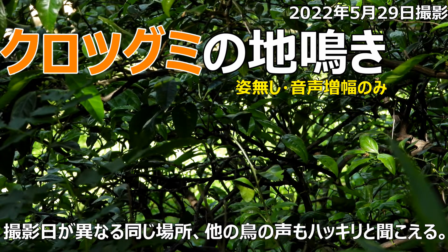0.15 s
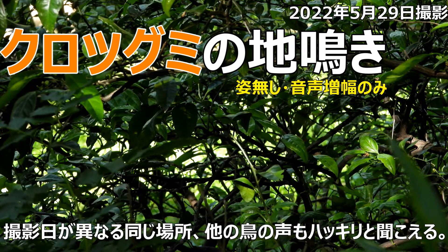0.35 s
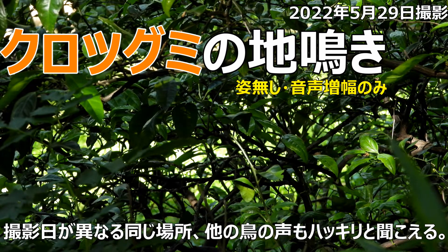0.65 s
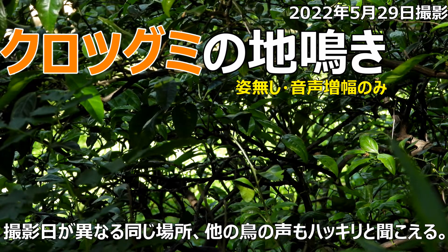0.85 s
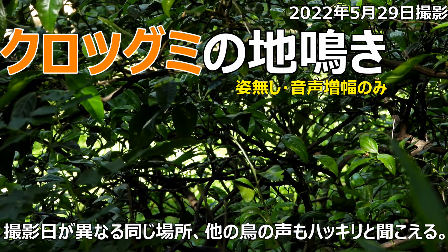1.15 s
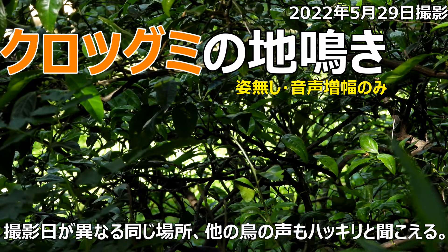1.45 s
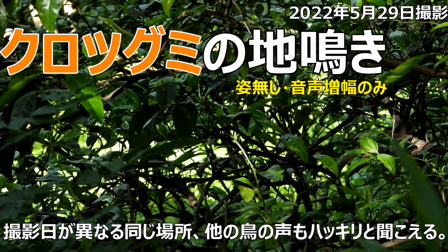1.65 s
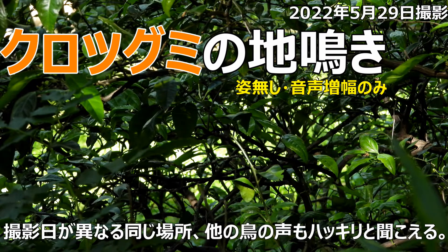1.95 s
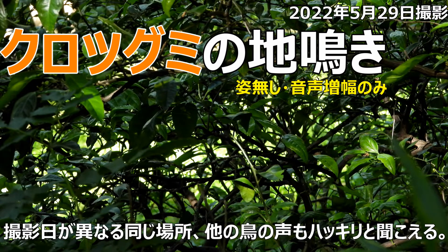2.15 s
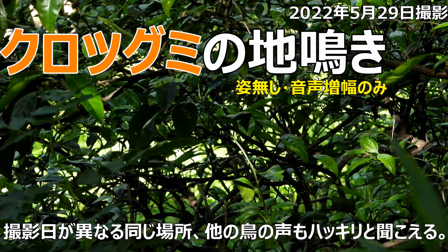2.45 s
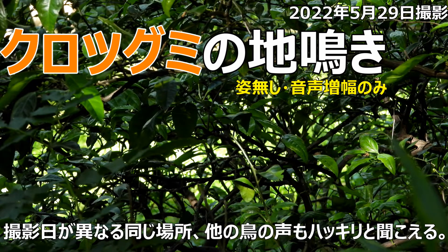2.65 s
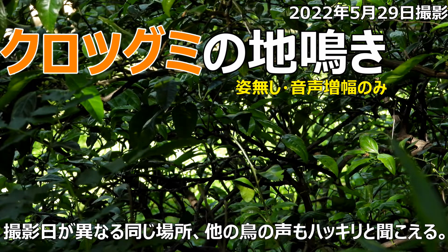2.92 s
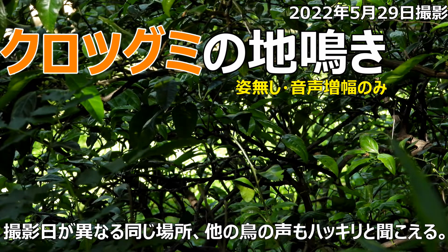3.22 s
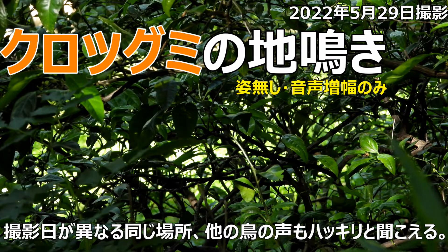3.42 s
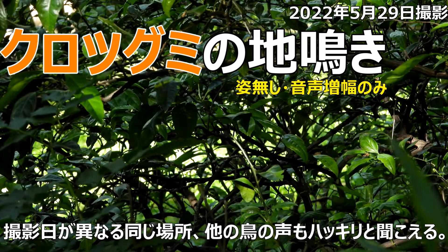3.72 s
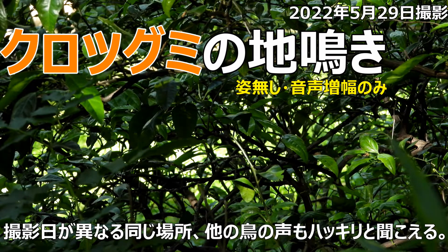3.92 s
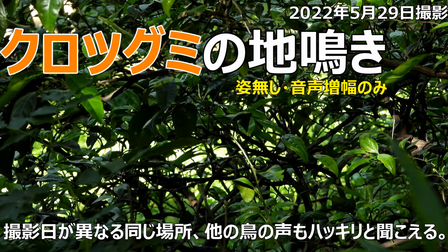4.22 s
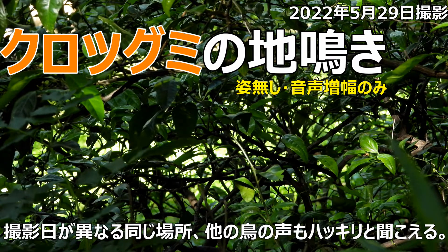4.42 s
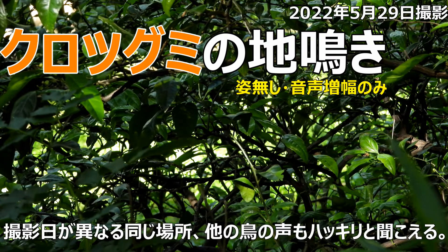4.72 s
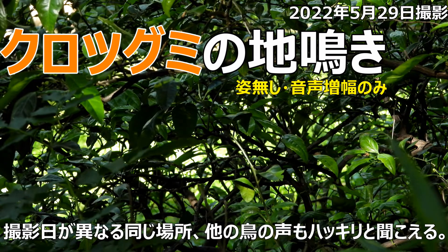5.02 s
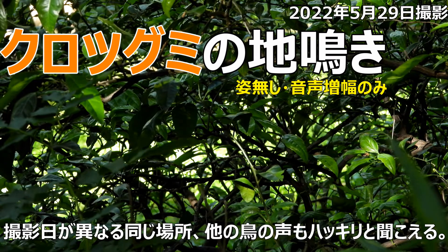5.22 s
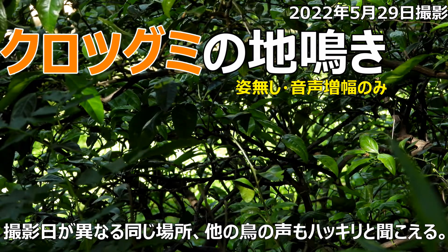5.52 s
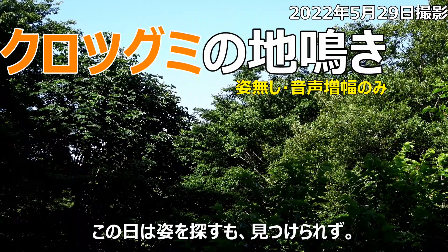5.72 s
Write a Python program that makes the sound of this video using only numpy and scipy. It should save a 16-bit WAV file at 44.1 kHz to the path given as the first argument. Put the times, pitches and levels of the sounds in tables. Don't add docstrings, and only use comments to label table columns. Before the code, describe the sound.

A hidden thrush gives sharp chuck calls echoing in dense woodland, with thin seeps, clear whistles, leaf hiss and low distant rumble.

```python
import sys
import numpy as np
from scipy import signal
from scipy.io import wavfile
from scipy.ndimage import uniform_filter1d, map_coordinates

SR = 44100
rng = np.random.default_rng(int(sys.argv[2]) if len(sys.argv) > 2 else 0)


def digitize_waveform(pressure):
    field = np.atleast_2d(pressure).T
    bounded = np.clip(field, -1, 1)
    quanta = np.round(bounded * 32767).astype(np.int16)
    wavfile.write(sys.argv[1], SR, quanta)


def voltage_ratio(decibels):
    exponent = np.asarray(decibels, float) / 20
    return 10 ** exponent


N = 258423
LEAD = SR // 4
NEW_PLACE_S = 5.71


def at_hz(points, hz):
    curve_hz, curve_db = np.transpose(points)
    return np.interp(np.log(hz), np.log(curve_hz), curve_db)


def drift(rate):
    r = np.exp(-80 * np.pi * rate / SR)
    slow = signal.lfilter([1], [1, -2 * r, r * r], rng.standard_normal(N // 40 + 2002))[2000:]
    slow = slow / np.sqrt(np.mean(slow ** 2) + 1e-20)
    return np.interp(np.arange(N) / 40, np.arange(len(slow)), slow)


def waver(count, rate):
    knots = rng.standard_normal(140)
    return map_coordinates(knots, [np.minimum(np.arange(count) / SR * rate, 138)], order=3)


def span(length_s):
    return np.linspace(0, 1, round(length_s * SR))


def pan(db):
    return voltage_ratio(np.array([[db], [-db]]) / 2)


def side_lag(track, count):
    return np.stack([track[0], np.roll(track[1], count)])


def add(track, start_s, hz, gain, partials=((1, 0),), pan_db=0, edge_s=0.011):
    phase = 2 * np.pi * (np.cumsum(hz) / SR + rng.random())
    age = np.arange(len(hz)) / SR
    edges = np.clip(np.minimum(age, age[::-1]) / edge_s, 0, 1)
    note = gain * edges * sum(voltage_ratio(db) * np.sin(k * phase) for k, db in partials)
    at = round(start_s * SR) + LEAD
    note = note[:track.shape[1] - at]
    track[:, at:at + len(note)] += pan(pan_db) * note


def scatter(track, t60, late_db, gap_s):
    age = np.arange(int(1.4 * SR)) / SR
    shape = voltage_ratio(-60 * age / t60) + voltage_ratio(late_db - 60 * age / (3.61 * t60))
    noise = rng.standard_normal((2, len(age)))
    dull = signal.sosfiltfilt(signal.butter(4, 8300, fs=SR, output="sos"), noise)
    echo = dull + (noise - dull) * voltage_ratio(-60 * age / 0.61)
    echo = echo * shape * np.clip(age / gap_s - 1, 0, 1)
    echo /= np.sqrt(np.sum(echo ** 2, axis=1, keepdims=True))
    return signal.fftconvolve(track, echo, axes=1)[:, :track.shape[1]]


def burst(track, length_s):
    age = np.arange(600) / SR
    echo = rng.standard_normal((2, len(age))) * np.exp(-age / length_s)
    echo /= np.sqrt(np.sum(echo ** 2, axis=1, keepdims=True))
    return signal.oaconvolve(track, echo, axes=1)[:, :track.shape[1]]


def seeper():
    # (time [s], length [s], end pitch [Hz], level [dB], slowing of the fall [exponent])
    seeps = [
        (-.2, 0.2, 6780, -48.5, 2.34),
        (1.24, 0.17, 6734, -36, 2.6),
        (1.753, 0.12, 6640, -36, 2.5),
        (3.636, 0.18, 7388, -38.5, 2.3),
        (5.092, .24, 6975, -40.5, 1.67),
    ]
    start_hz, flick_hz, flick_s = 9360, 702, .012
    peak_at = 0.67
    voice = np.zeros((2, N + LEAD))
    for s, length_s, end_hz, db, bend in seeps:
        x = span(length_s)
        hz = end_hz + (start_hz - end_hz) * (1 - x) ** bend
        hz += flick_hz * np.exp(-x * length_s / flick_s)
        swell_db = -16 * np.maximum(1 - x / peak_at, 0) ** 3.67
        fade_db = -7 * np.maximum((x - peak_at) / (1 - peak_at), 0) ** 2
        add(voice, s, hz, np.sqrt(2) * voltage_ratio(db + swell_db + fade_db), ((1, 4), (2, -44)), pan_db=2.7)
    echoes = scatter(voice, t60=0.56, late_db=-18.0, gap_s=0.00033)
    return voltage_ratio(-7) * side_lag(voice, count=-3) + voltage_ratio(-3.0) * echoes


def banded_noise(spectrum, patchy_db):
    # (pitch [Hz], left-right likeness [-1 to 1])
    likeness = [(30, 0.99), (70, 0.96), (150, 0.99), (400, 0.77), (800, 0.57), (1600, 0.58), (4000, 0.036)]
    low_hz, high_hz = spectrum[0][0], min(spectrum[-1][0], 11000)
    edges = np.geomspace(low_hz, high_hz, round(3 * np.log2(high_hz / low_hz)) + 1)
    out, together, white = 0, drift(2.26), rng.standard_normal((2, 2, N))
    for k, (low, high) in enumerate(zip(edges, edges[1:])):
        band = signal.butter(2, [low, high], "band", fs=SR, output="sos")
        mid, side = signal.sosfilt(band, white[k % 2])
        hz = np.sqrt(low * high)
        alike = np.clip(at_hz(likeness, hz), -1, 1)
        gain = voltage_ratio(at_hz(spectrum, hz) + patchy_db * (1.1 * together + drift(5.5)))
        out = out + gain * (np.sqrt(1 + alike) * mid + np.sqrt(1 - alike) * side * [[1], [-1]])
    return out / np.sqrt(np.mean(out.mean(axis=0) ** 2) + 1e-20)


def traffic():
    # (pitch [Hz], level [dB per Hz])
    rumble = [(15, -72), (25, -33.5), (75, -28.5), (94, -26.5), (154, -11), (199, -4), (253, -10.5),
              (285, -0.5), (350, -4.5), (476, -5.5), (537, -10.5), (756, -6), (1500, -14.5), (1950, -51.5),
              (3300, -120)]
    t = np.arange(N) / SR
    passing_db = 3 * np.exp(-((t - 4.71) / 0.29) ** 2)
    level_db = np.where(t < NEW_PLACE_S, -46 - 0.54 * t + passing_db, -43)
    return side_lag(voltage_ratio(level_db) * pan(0.46) * banded_noise(rumble, patchy_db=1.45), count=3)


def leaves():
    # (pitch [Hz], level [dB per Hz])
    leaf_tone = [(710, -2), (1200, -15.5), (1380, -11.5), (1870, -2), (2060, -7), (2550, -2.5), (3200, -2),
                 (3520, -9.5), (4380, -6), (5500, -13.5), (9710, -31), (12600, -77.5), (21400, -120)]
    # (time [s], level [dB])
    breeze = [(0, -50), (.45, -54.5), (1.6, -50.5), (2.5, -51), (3, -51.5), (4.2, -49.5), (5.2, -51.5),
              (5.45, -55), (5.66, -52.5)]
    t = np.arange(N) / SR
    level_db = np.where(t < NEW_PLACE_S, np.interp(t, *np.transpose(breeze)), -48)
    return voltage_ratio(level_db) * pan(0.55) * banded_noise(leaf_tone, patchy_db=1.64)


def drone():
    # pitch [Hz], width [Hz], level [dB]
    resonance = (772, 30, -59.5)
    hz, width_hz, db = resonance
    r = np.exp(-np.pi * width_hz / SR)
    poles = [1, -2 * r * np.cos(2 * np.pi * hz / SR), r * r]
    hum = signal.lfilter([1, 0, -1], poles, rng.standard_normal(N))
    return voltage_ratio(db + 1.6 * drift(1.9)) * hum / np.sqrt(np.mean(hum ** 2) + 1e-20)


def thrush():
    # (time of the pitch top [s], level [dB], start [Hz], top [Hz], head turned away [0-1])
    chucks = [(0.066, -17, 2393, 3885, .45), (.796, -13, 2240, 3935, 0.02), (1.023, -12, 2367, 4317, 0),
              (4.019, -13.5, 2080, 4450, 1), (4.186, -13, 2278, 4458, 0.88),
              (4.274, -13.5, 2580, 4404, 0.5), (4.395, -15.5, 2904, 4490, 0.8),
              (4.536, -11.5, 2780, 4719, 0.67), (4.784, -11, 2585, 4620, 0.19)]
    # (delay [s], left [dB], right [dB])
    trunks = [
        (0.013, -15, -25),
        (0.014, -11, -8.5),
        (.023, -11, -29),
        (0.035, -37, -17),
    ]
    # (pitch [Hz], level [dB])
    through_leaves = [(1500, -7), (2000, -18), (2500, -5), (3200, -6.5), (3700, -6.5), (4000, -31),
                      (4500, -17), (6000, -11), (7000, -54)]
    # (pitch [Hz], level [dB])
    toward_trunks = [(1500, -15.5), (2000, -12), (2600, -7.5), (3100, -6), (3700, -5.5), (4400, -3.5),
                     (5200, -6), (6500, -1), (8500, -4.5), (11000, 3)]
    direct, thrown = np.zeros((2, 2, N + LEAD))
    for top_s, db, start_hz, top_hz, turn in chucks:
        height_khz, end_hz = (top_hz - 3850) / 1000, .39 * top_hz
        rise_s, bend = .0075 + .007 * height_khz, 1.45 - .95 * height_khz
        t = np.arange(-rise_s, .034, 1 / SR)
        rising = top_hz + (start_hz - top_hz) * (np.maximum(-t, 0) / rise_s) ** bend
        falling = end_hz + (top_hz - end_hz) * np.exp(-t / .011)
        hz = uniform_filter1d(np.where(t < 0, rising, falling), size=150, mode="nearest")

        effort = np.exp(-((t - .004) / np.where(t < .004, .015, .019)) ** 2)
        upstroke_db = -2.5 * np.clip(-t / 0.0003, 0, 1)
        low_end_db = (-5.5 + 9.5 * turn) * np.clip(t / 0.026, 0, 1)
        effort *= voltage_ratio(upstroke_db + low_end_db + 2 * waver(len(t), 444))

        overtone_db = -13.5 - 3.5 * turn - 15 * np.exp(-((t - .003) / .0075) ** 4)
        hollow_db = -10.5 * turn * np.exp(-((hz - 3724) / 313) ** 2)
        ridge_db = 6 * turn * np.exp(-((hz - 3050) / 220) ** 2)
        turned = voltage_ratio(hollow_db + ridge_db)
        paths = ((direct, through_leaves, np.where(t < 0, 1, turned)), (thrown, toward_trunks, turned))
        for track, colour, shade in paths:
            second_db = overtone_db - 30 * (t < 0) * (track is direct)
            levels_db = (0, second_db, overtone_db - 18)
            partials = [(k, level_db + at_hz(colour, k * hz)) for k, level_db in enumerate(levels_db, 1)]
            add(track, top_s - rise_s, hz, voltage_ratio(db) * effort * shade, partials, edge_s=.3 * rise_s)

    out = direct * voltage_ratio([[0], [-11]])
    twigs = np.roll(burst(direct, length_s=.011), round(.002 * SR), axis=1)
    out += voltage_ratio([[-1], [-10]]) * twigs
    for delay_s, *db in trunks:
        echo = np.roll(burst(thrown, length_s=0.00031), round(delay_s * SR), axis=1)
        out += voltage_ratio(db)[:, None] * echo
    tail = scatter(thrown, t60=0.23, late_db=-2.5, gap_s=.008)
    return side_lag(out, count=4) + voltage_ratio([[-3.5], [-8.5]]) * tail


def glide(track, s, length_s, start_hz, end_hz, db, pan_db):
    x = span(length_s)
    hz = (start_hz + (end_hz - start_hz) * x) * (1 + .011 * waver(len(x), 60))
    gain = voltage_ratio(db + 3 + 2 * waver(len(x), 70))
    add(track, s, hz, gain, pan_db=pan_db, edge_s=min(.012, length_s / 3))


def far_birds(new_place):
    # (time [s], length [s], start [Hz], end [Hz], level [dB])
    far_notes = [(0.325, 0.039, 7800, 7120, -58), (1.828, 0.14, 5040, 4190, -52.5),
                 (2.03, 0.11, 3523, 3470, -47), (2.367, 0.21, 3726, 3560, -48.5),
                 (2.499, 0.059, 4930, 4630, -49.5), (2.5, 0.073, 8230, 7100, -58),
                 (3.204, .06, 7900, 7250, -63), (3.922, 0.052, 2720, 2554, -46.5),
                 (3.944, 0.042, 6330, 6100, -52), (3.985, 0.021, 4630, 4530, -49),
                 (4.493, .05, 2450, 2400, -45), (4.69, 0.052, 7700, 7280, -59),
                 (4.755, 0.064, 5675, 6100, -48.5), (4.906, .19, 2610, 2845, -45.5),
                 (5.087, 0.25, 2847, 2814, -50), (5.351, 0.14, 1710, 1903, -54.5),
                 (5.756, .1, 5200, 5160, -48), (5.613, 0.059, 3525, 3050, -46),
                 (5.808, 0.04, 3280, 4140, -36.5), (5.804, 0.02, 4140, 4200, -39.5)]
    # (time [s], length [s], pitch [Hz], level [dB])
    hoots = [
        (0.922, 0.047, 341.5, -43.5),
        (1.379, 0.039, 305, -44.5),
        (4.504, 0.037, 270.5, -44),
        (4.679, 0.05, 283, -40),
        (4.793, 0.043, 294, -47),
    ]
    # (time [s], length [s], start [Hz], end
    # [Hz], level [dB])
    warblers = [(0.805, 0.048, 4940, 4700, -45), (1.498, 0.31, 2800, 2270, -53),
                (1.502, 0.4, 3946, 3914, -54.5), (2.204, 0.16, 2480, 2540, -51.5),
                (2.88, 0.2, 2483, 2205, -51), (3.039, .25, 2350, 2760, -51.5),
                (3.273, 0.17, 2450, 3500, -50.5), (3.451, .15, 3460, 3470, -54),
                (3.68, 0.19, 3320, 3280, -51.5), (3.556, 0.28, 2780, 2750, -52.5),
                (5.496, 0.13, 4680, 4870, -57)]
    # (time [s], length [s], pitch [Hz], level [dB])
    nasal = [
        (3.4, 0.083, 898, -54),
        (3.518, 0.13, 895, -59.5),
        (3.68, 0.12, 902, -60),
    ]
    # (multiple of the pitch, level [dB])
    nasal_partials = [(3, -22), (4, 4), (5, 1), (6, -3), (7, -4), (8, 1), (9, -4)]
    voice = np.zeros((2, N + LEAD))
    for note in far_notes:
        if (note[0] > NEW_PLACE_S) == new_place:
            glide(voice, *note, pan_db=-3)
    for s, length_s, start_hz, end_hz, db in warblers:
        if (s > NEW_PLACE_S) == new_place:
            x = span(length_s)
            hz = start_hz + (end_hz - start_hz) * x + 145 * waver(len(x), 120)
            gain = np.sqrt(2) * voltage_ratio(db + 2.5 * waver(len(x), 29.7))
            add(voice, s, hz, gain, edge_s=min(0.021, length_s / 3))
    if not new_place:
        for s, length_s, hz, db in hoots:
            glide(voice, s, length_s, hz, hz, db, pan_db=7.5)
        for s, length_s, hz, db in nasal:
            age = np.arange(0, length_s, 1 / SR)
            slide = hz * (1.01 - .12 * age - .2 * np.exp(-age / 0.017))
            slide *= 1 + 0.011 * waver(len(age), 40)
            add(voice, s, slide, voltage_ratio(db + 2 + 3.5 * waver(len(age), 77)), nasal_partials)
    return voltage_ratio(-7) * voice + voltage_ratio(-2) * scatter(voice, t60=.35, late_db=-14, gap_s=.003)


def whistler():
    # (time [s], length [s], top of the strongest partial [Hz], level [dB], upper partials [dB])
    whistles = [
        (1.907, 0.14, 3238, -33, -12),
        (2.183, 0.11, 3236, -29, -1.5),
        (2.383, .148, 3303, -25, -1),
    ]
    # (multiple of the pitch, level [dB])
    whistle_partials = [(1, 0.5), (1.5, -21.5), (2, -17.5), (2.5, -41), (3, -51)]
    top_at = 0.595
    voice = np.zeros((2, N + LEAD))
    for s, length_s, top_hz, db, upper_db in whistles:
        x = span(length_s)
        before, after = (top_at - x) / top_at, (x - top_at) / (1 - top_at)
        hz = top_hz * (1 - np.where(before > 0, .04 * before ** 2, 0.055 * after ** 2))
        hz *= 1 - .12 * np.exp(-x * length_s / .02)
        ends_db = -23 * np.abs(2 * x - 1) ** 3.24
        level_db = db + ends_db + waver(len(x), 78)
        partials = [(k, part_db + upper_db * (k > 1)) for k, part_db in whistle_partials]
        add(voice, s, hz, np.sqrt(2) * voltage_ratio(level_db), partials, pan_db=3.0)
    echoes = scatter(voice, t60=0.22, late_db=-5, gap_s=0.0022)
    return voltage_ratio(-0.5) * side_lag(voice, count=3) + voltage_ratio(-10.5) * echoes


def dropout():
    t = np.arange(N) / SR
    cut_s = 5.68
    trace = voltage_ratio(-37.5 - 1500 * np.maximum(t - cut_s, 0))
    back = (t > 5.722) * voltage_ratio(1200 * np.minimum(t - 5.755, 0))
    return np.where(t < cut_s, 1, trace + back)


def scene():
    t = np.arange(N) / SR
    first = seeper() + thrush() + far_birds(False) + whistler()
    birds = np.where(t < NEW_PLACE_S, first[:, LEAD:], far_birds(True)[:, LEAD:])
    return birds + traffic() + leaves() + drone()


def drop_faint_treble(x):
    # (pitch [Hz], level [dB per bin])
    faint_treble = [(6000, -130), (7600, -104), (8200, -91), (9000, -91), (10000, -97), (15000, -99.5)]
    hz, _, frames = signal.stft(x, SR, nperseg=2048)
    power = (np.abs(frames[:, :1024]) ** 2).reshape(2, 64, 16, -1).mean(axis=(0, 2))
    limit = voltage_ratio(at_hz(faint_treble, hz[8:1024:16]))[:, None] ** 2
    keep = power ** 4 / (power ** 4 + limit ** 4)
    frames[:, :1024] *= np.repeat(keep, 16, axis=0)
    return signal.istft(frames, SR, nperseg=2048)[1][:, :N]


def roll_off(x):
    return signal.sosfilt(signal.butter(12, 15300, fs=SR, output="sos"), x)


def record(dry):
    mix = drop_faint_treble(dry) * dropout()
    return roll_off(mix)


dry = scene()
out = record(dry)
digitize_waveform(out)
```